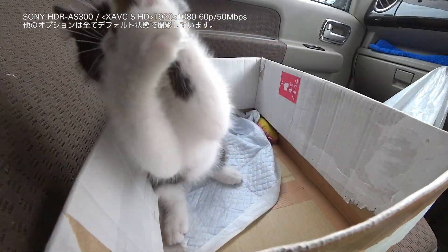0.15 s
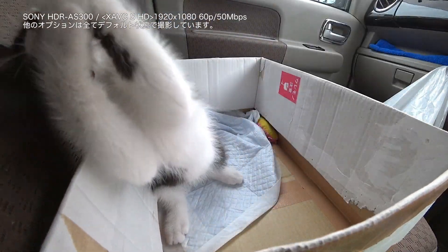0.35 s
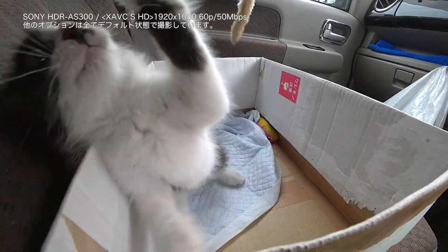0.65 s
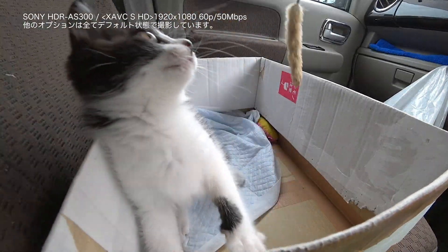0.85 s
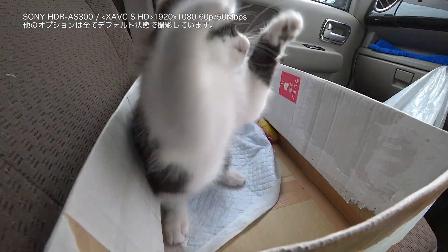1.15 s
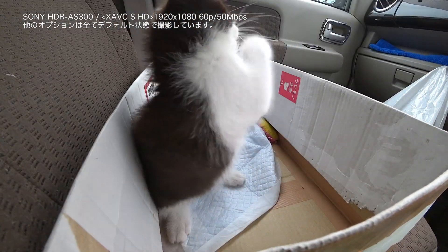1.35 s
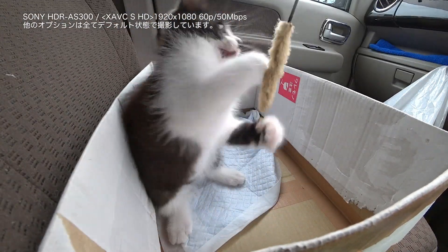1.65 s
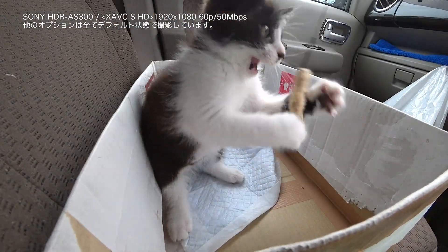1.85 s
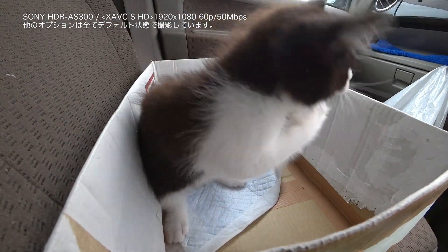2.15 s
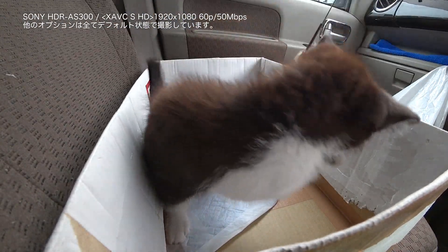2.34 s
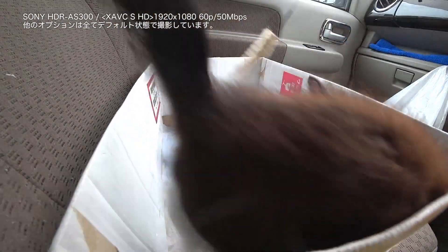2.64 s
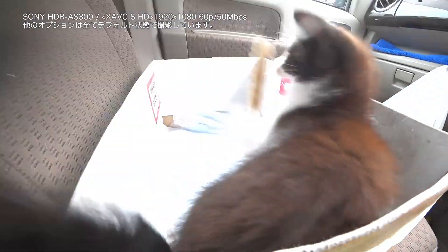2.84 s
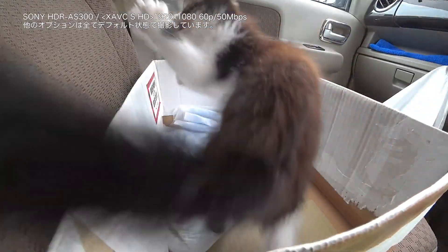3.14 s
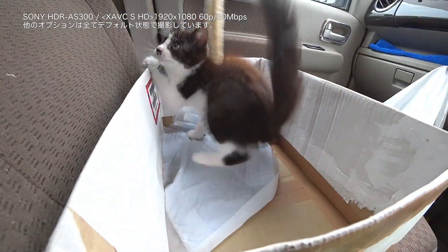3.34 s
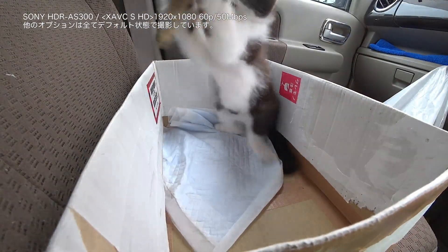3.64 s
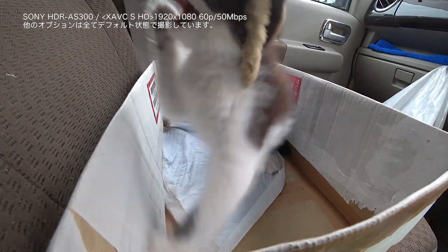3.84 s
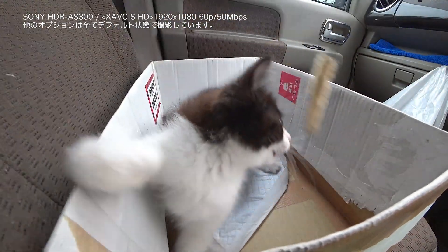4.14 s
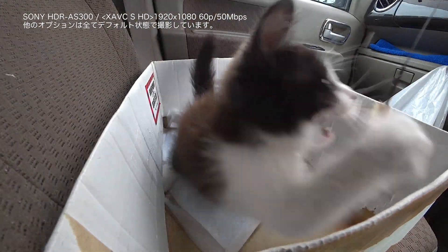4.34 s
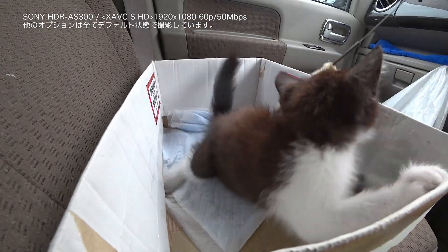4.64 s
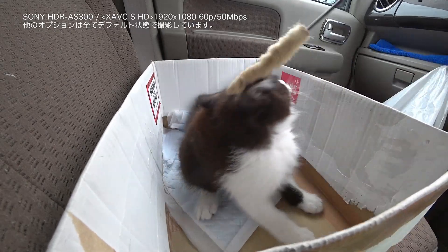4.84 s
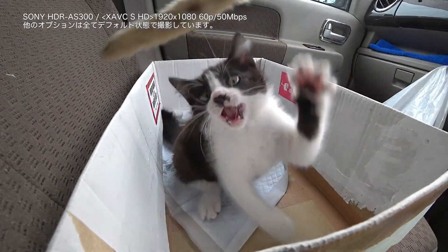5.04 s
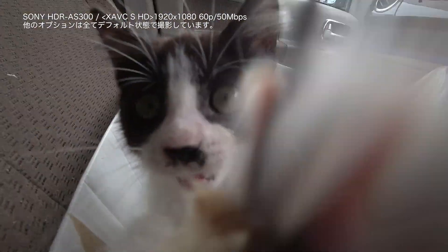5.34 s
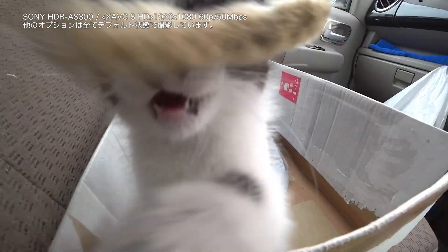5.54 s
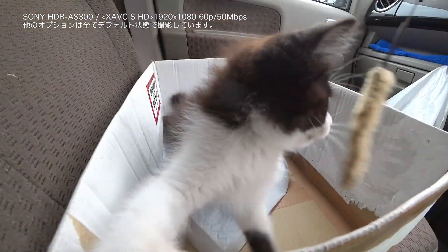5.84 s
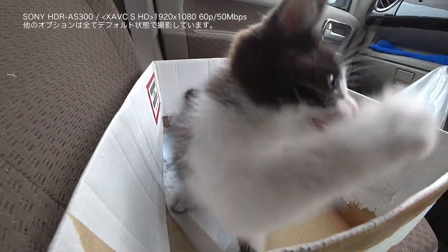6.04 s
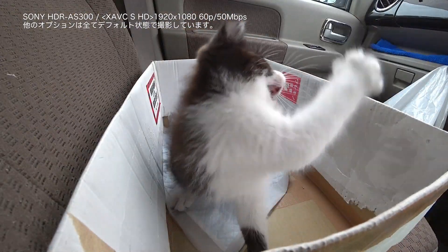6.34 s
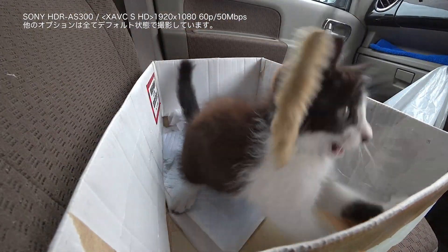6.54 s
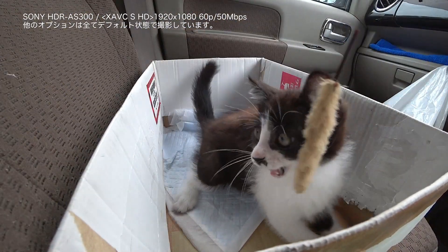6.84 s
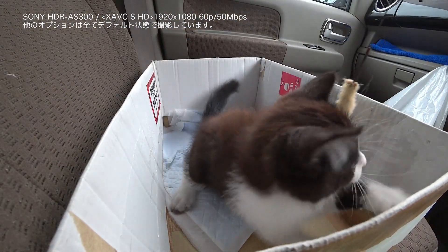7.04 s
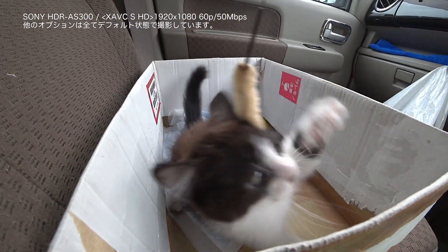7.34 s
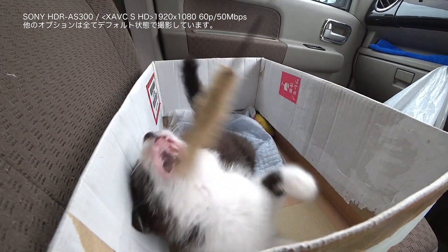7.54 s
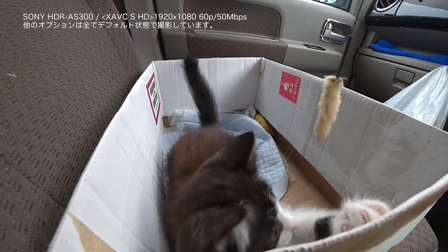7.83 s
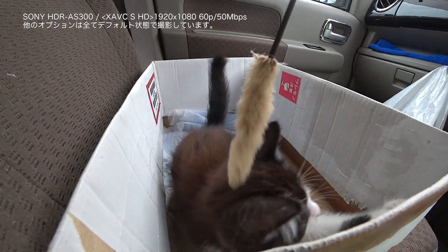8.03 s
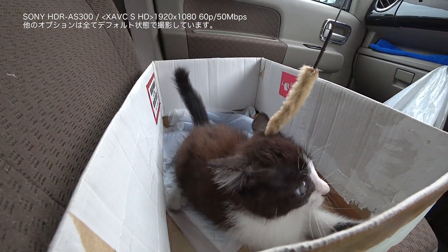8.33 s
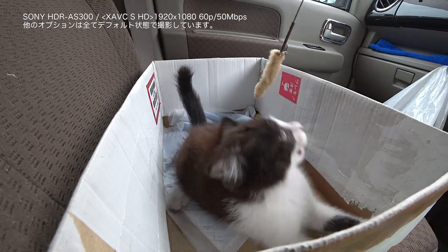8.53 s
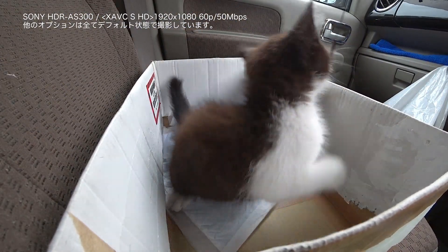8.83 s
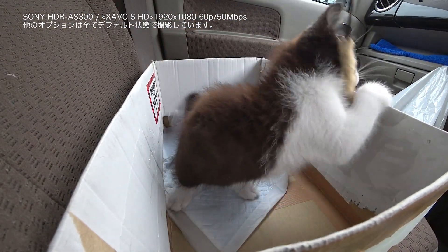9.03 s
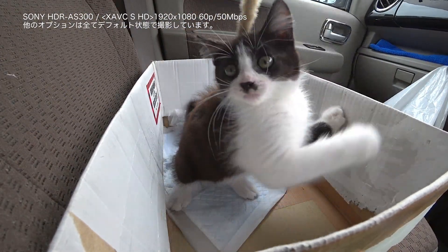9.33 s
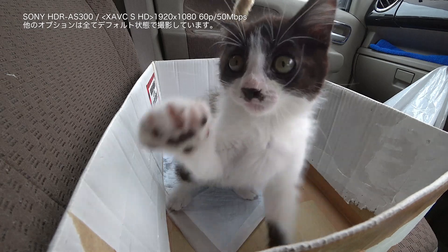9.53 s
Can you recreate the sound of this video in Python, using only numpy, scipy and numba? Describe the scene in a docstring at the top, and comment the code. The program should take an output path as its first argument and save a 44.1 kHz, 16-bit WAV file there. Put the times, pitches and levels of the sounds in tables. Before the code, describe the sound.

A kitten jumps around in a cardboard box, heard close up in a parked car with a faint hush and very little echo. A soft paw knock opens, followed by a sharp claw click and scratch at about 0.9 seconds, then faint fur brushing. From 2.6 seconds, hollow paw thumps, ticks and short scrapes come in quick, irregular clusters, busiest between 3.5 and 5 seconds. Around 5.4 seconds, a bright, crisp swipe of claws sounds especially close and wide. A smaller scuffle follows near 6 seconds and a strong burst of knocks and scratches around 6.5. After a quieter moment, sharp claw strikes land at about 7.8 and 8.1 seconds. Lighter taps and knocks resume near 9 seconds, with a short scrape around 9.5 and a last tap just after.

```python
"""A kitten leaps about in an open cardboard box inside a parked car.
Paws thud on the panels and ring their modes, pads judder over the board, claws tick and
stick-slip along the paper skin, fur brushes the walls. The padded cabin adds a short tail
over a faint hush; a small stereo microphone stands close by."""
import sys
import numpy as np
from scipy import signal
from scipy.fft import rfft, irfft
from scipy.io import wavfile
from scipy.ndimage import uniform_filter1d
from numba import njit

SR = 44100
rng = np.random.default_rng(int(sys.argv[2]) if len(sys.argv) > 2 else 0)


def master_out(mix):
    """Clip the mix to full scale and print it as 16-bit PCM to the path in sys.argv[1]."""
    frames = np.transpose(np.atleast_2d(mix))
    ceiling = np.clip(frames, -1, 1)
    pcm = np.round(ceiling * 32767).astype(np.int16)
    wavfile.write(sys.argv[1], SR, pcm)


N = 426888
LN_60DB = np.log(1000)
SIDE_SIGNS = np.array([[1], [-1]])  # left, right


def undb(db):
    """Decibels to gain."""
    return 10 ** (np.asarray(db) / 20)


def unit_rms(x):
    """Scale to rms 1."""
    return x / np.sqrt(np.mean(x ** 2))


@njit
def svf(x, hz, q):
    """State-variable band-pass, unity gain at its moving centre."""
    y = np.empty(len(x))
    band_state, low_state, damping = 0., 0., 1 / q
    for i in range(len(x)):
        g = np.tan(np.pi * hz[i] / SR)
        v = (band_state + g * (x[i] - low_state)) / (1 + g * (g + damping))
        band_state = 2 * v - band_state
        low_state += 2 * g * v
        y[i] = damping * v
    return y


def band(x, hz, q):
    """Band-pass at a steady or moving centre."""
    return svf(x + 1e-18, np.clip(hz + np.zeros(len(x)), 40, .4 * SR), float(q))


def shaped_noise(spectrum):
    """Steady noise from (f/Hz, level/dB) points, rms 1."""
    hz, db = np.transpose(spectrum)
    bins_hz = np.maximum(np.arange(N // 2 + 1) * SR / N, 1)
    gain = undb(np.interp(np.log(bins_hz), np.log(hz), db))
    return unit_rms(irfft(rfft(rng.standard_normal(N)) * gain, N))


def wander(rate_hz):
    """Random levels joined by ramps, rms 1."""
    hold = max(int(SR / rate_hz), 1)
    steps = np.repeat(rng.standard_normal(N // hold + 1), hold)
    return unit_rms(uniform_filter1d(steps, hold)[:N])


def jolts(rate_hz, fade_s, spread_db):
    """Envelope of random pushes, each dying away."""
    kicks = (rng.random(N) < rate_hz / SR) * undb(spread_db * rng.standard_normal(N))
    return signal.lfilter([1], [1, -np.exp(-1 / (fade_s * SR))], kicks)


def grit(shape, spread_db):
    """Slips of a point over paper fibres: most tiny, a few large."""
    return rng.standard_normal(shape) * undb(spread_db * rng.exponential(size=shape))


def radiate(x, pitch_hz):
    """A small patch of board radiates little below a quarter of its pitch."""
    return signal.sosfilt(signal.butter(2, pitch_hz / 4, "highpass", fs=SR, output="sos"), x)


def pressure(start_s, press_s, hold_s, release_s):
    """Trapezoid of contact force, 0 to 1; returns sample indices and force."""
    knots_s = start_s + np.cumsum([0, press_s, hold_s, release_s])
    span = np.arange(int(start_s * SR), min(int(knots_s[-1] * SR), N))
    return span, np.interp(span / SR, knots_s, [0, 1, 1, 0])


def add_hit(track, start_s, x, peak_db):
    """Mix x into track, scaled to a peak level."""
    i = int(start_s * SR)
    track[i:i + len(x)] += undb(peak_db) * x[:len(track) - i] / np.abs(x).max()


# hush spectra, mid and side: f/Hz, relative density/dB
HUSH_MID_SPECTRUM = [(20, 11.5), (60, 2), (127, -2.5), (370, -10), (937, -2), (1720, -6), (2610, -18),
                     (7600, -16.5), (12000, -10), (16000, -11)]
HUSH_SIDE_SPECTRUM = [(18, -78), (30, -41.5), (404, -2.5), (844, 2.5), (1910, -1.5), (5900, -18),
                      (8520, -18.5), (11100, -18), (16000, -60)]


def hush(mid_db=-61.5, side_db=-60.5):
    """Still air and microphone hiss; the midrange wavers and differs between channels."""
    mid = undb(mid_db + 0.4 * wander(14)) * shaped_noise(HUSH_MID_SPECTRUM)
    side = undb(side_db + 1.4 * wander(6)) * shaped_noise(HUSH_SIDE_SPECTRUM)
    return mid + side * SIDE_SIGNS


# box panel modes: f/Hz, relative level/dB
PANEL_MODES = [(75, -13), (110, -9), (165, -9), (245, -0.5), (330, -4), (435, -3), (600, 2), (720, 3),
               (900, 4), (1150, 5), (1400, 5), (1700, 7), (2050, 3.5), (2500, -1.5)]


def panel_rumble(friction):
    """The middle panel modes, driven by rubbing; rms 1."""
    return unit_rms(sum(undb(db) * band(friction, hz, q=0.98) for hz, db in PANEL_MODES[3:-3]))


# fur hiss spectrum: f/Hz, relative density/dB
FUR_SPECTRUM = [(900, -4), (2400, -7), (4200, -3.5), (6100, -1.5), (9000, -5.5), (12000, -2), (16000, -4)]
# fur strokes on the walls: t/s, press/s, hold/s, release/s, level/dB
FUR_STROKES = [(0.01, 0.053, 0.0091, 0.16, -52), (0.705, 0.08, 0.083, 0.054, -58.5),
               (1.159, 0.25, 0.024, 0.055, -58.5), (1.597, 0.24, 0.011, 0.083, -54),
               (2.01, 0.15, 0.28, 0.074, -63.5), (2.542, 0.014, 0.0092, 0.018, -46),
               (2.899, 0.025, 0.19, 0.13, -51), (3.502, 0.12, 0.023, 0.13, -43),
               (3.744, 0.11, 0.038, 0.028, -47.5), (4.056, 0.017, 0.015, 0.048, -43.5),
               (4.095, 0.041, 0.22, 0.045, -56.5), (4.4, 0.016, .004, 0.014, -58),
               (4.539, 0.045, 0.28, .03, -48.5), (4.918, 0.059, 0.044, 0.3, -51.5),
               (5.207, 0.11, 0.017, .02, -46), (5.486, 0.017, 0.021, 0.22, -56.5),
               (5.63, 0.064, 0.0094, 0.033, -50), (6.705, 0.074, 0.074, 0.024, -55.5),
               (7.408, 0.213, 0.19, .03, -60), (7.8, 0.016, 0.02, 0.15, -60),
               (7.932, 0.054, .02, 0.065, -60), (8.523, 0.026, 0.0065, 0.034, -63.5),
               (8.732, 0.076, 0.015, 0.024, -59.5), (8.954, 0.019, 0.092, 0.053, -48.5),
               (9.163, 0.059, 0.012, 0.076, -55), (9.266, 0.077, 0.046, 0.21, -55.5),
               (9.56, 0.027, 0.0055, 0.033, -62)]


def fur(rest_db=-68.5, force_power=1.9):
    """Hair hisses along the walls, bedding crackles; pads shift weight and the panels murmur."""
    gain = np.full(N, undb(rest_db))
    for *timing, db in FUR_STROKES:
        span, force = pressure(*timing)
        gain[span] += undb(db) * force ** force_power
    brush_db = 20 * np.log10(gain)
    hair = undb(brush_db + wander(21)) * shaped_noise(FUR_SPECTRUM)
    crackle = 1 + 0.94 * jolts(90, fade_s=0.0013, spread_db=2.1)
    murmur = panel_rumble(rng.standard_normal(N))
    weight = 0.65 + jolts(11, fade_s=0.0079, spread_db=3)
    return hair * crackle + undb(0.42 * brush_db - 34) * murmur * weight


# paw landings, lowest under full weight on the floor: t/s, peak/dB, struck f/Hz, T60 at 600 Hz/s
PAW_LANDINGS = [(0.068, -21.5, 490, 0.015), (0.375, -48.5, 810, 0.051), (0.405, -49, 510, 0.019),
                (0.794, -28.5, 800, 0.026), (0.835, -44.5, 440, 0.013), (2.085, -43.5, 960, 0.048),
                (2.582, -22.5, 715, 0.042), (2.599, -30, 434, 0.041), (2.659, -17.5, 720, 0.021),
                (2.687, -24, 880, 0.032), (2.778, -34, 255, 0.016), (2.788, -41, 710, 0.027),
                (2.82, -40, 110, 0.03), (2.83, -24, 515, 0.036), (2.97, -40.5, 240, 0.02),
                (3.323, -23, 260, 0.016), (3.352, -22, 463, 0.024), (3.359, -26, 255, 0.017),
                (3.469, -19, 203, 0.025), (3.499, -30, 400, 0.054), (3.6695, -8.5, 630, 0.021),
                (3.677, -26, 245, 0.05), (3.75, -19.5, 300, 0.03), (3.762, -28.5, 228, 0.052),
                (3.903, -18.5, 1240, 0.051), (3.967, -33, 119, 0.073), (3.972, -13, 417, 0.037),
                (4.027, -11, 1240, 0.018), (4.033, -12, 635, 0.051), (4.243, -41.5, 600, 0.025),
                (4.301, -23.5, 686, 0.024), (4.458, -8, 1360, 0.021), (4.511, -12, 866, 0.048),
                (4.528, -13, 1430, 0.021), (4.549, -25, 960, 0.018), (4.594, -34, 116, 0.032),
                (4.605, -26.5, 313, 0.011), (4.827, -25.5, 423, 0.021), (4.918, -9, 556, 0.026),
                (5.288, -35, 876, 0.023), (5.3365, -13, 697, 0.019), (5.342, -29.5, 118, 0.074),
                (5.398, -17, 1910, 0.014), (5.409, -33.5, 290, 0.016), (5.44, -19, 2130, 0.044),
                (5.911, -29.5, 1420, 0.051), (5.983, -25.5, 1440, 0.023), (5.991, -44, 116, 0.078),
                (5.995, -26, 850, 0.063), (6.442, -9, 1370, 0.032), (6.489, -24, 895, 0.024),
                (6.504, -25, 1650, 0.05), (6.557, -23.5, 1370, 0.06), (6.649, -9, 1490, 0.029),
                (6.92, -43, 713, 0.028), (7.097, -41, 313, 0.039), (7.195, -45.5, 900, 0.037),
                (7.733, -36, 458, 0.015), (7.741, -35, 447, 0.0076), (7.753, -16.5, 950, 0.046),
                (8.112, -22.5, 600, 0.022), (8.193, -31.5, 380, 0.018), (8.919, -26.5, 580, 0.034),
                (9.042, -45, 96.9, 0.061), (9.043, -36, 440, 0.094), (9.097, -17.5, 1065, 0.021),
                (9.636, -33, 1330, 0.16), (9.66, -37, 900, 0.043)]


def paw_thuds(below_db=9, above_db=10.5, skirt_power=1.15, scatter_db=2.5, push_cycles=.7):
    """A soft pad pushes for about a cycle; panel modes near the struck pitch ring most."""
    out, t = np.zeros(N), np.arange(8192) / SR
    mode_hz, mode_db = np.array(PANEL_MODES).T[:, :, None]
    ring_scale = (600 / mode_hz) ** 0.38  # low modes ring longer
    draws = rng.standard_normal((len(PAW_LANDINGS), 3, len(PANEL_MODES), 1))
    for (start_s, peak_db, struck_hz, t60_s), (detune, scatter, phase) in zip(PAW_LANDINGS, draws):
        octaves = np.log2(mode_hz / struck_hz)
        skirt_db = np.where(octaves > 0, above_db, below_db) * np.abs(octaves) ** skirt_power
        gain = undb(mode_db + scatter_db * scatter - skirt_db)
        decay = np.exp(-LN_60DB * t / (t60_s * ring_scale))
        modes = np.sin(2 * np.pi * mode_hz * (1 + 0.065 * detune) * t + 0.57 * phase)
        push = 1 - np.exp(-(t * struck_hz / push_cycles) ** 2)
        thud = (gain * decay * modes).sum(axis=0) * push
        add_hit(out, start_s, radiate(thud, struck_hz), peak_db)
    return out


# claw strikes: t/s, peak/dB, centre f/Hz, T60/s
CLAW_STRIKES = [(0.0724, -35, 2100, 0.026), (0.087, -44, 2020, 0.011), (0.394, -44, 4500, 0.015),
                (0.7905, -21, 4540, 0.021), (0.8706, -10, 3700, 0.0049), (0.882, -4.5, 4800, 0.03),
                (1.12, -28.5, 3680, 0.01), (1.133, -27.5, 3900, 0.012), (1.828, -37, 5960, 0.012),
                (2.138, -41, 4500, 0.02), (2.5837, -17.5, 2210, 0.041), (2.6609, -12, 4350, 0.022),
                (2.831, -15.5, 5900, 0.043), (3.277, -24, 5400, 0.021), (3.322, -28.5, 2140, 0.018),
                (3.3635, -21, 4650, 0.022), (3.4684, -16, 5950, 0.053), (3.6695, -32, 2380, 0.008),
                (3.749, -16.5, 6260, 0.045), (3.822, -37.5, 8000, 0.012), (3.903, -9, 3340, 0.019),
                (3.916, -12, 3480, 0.06), (3.943, -8.5, 3340, 0.03), (4.032, -17.5, 4960, 0.025),
                (4.4512, -11.5, 2700, 0.019), (4.457, -11, 3150, 0.026), (4.4817, -22, 4920, 0.088),
                (4.5101, -13.5, 2200, 0.024), (4.5266, -17.5, 2030, 0.037), (4.9174, -19, 4700, 0.067),
                (5.3432, -7, 2070, 0.011), (5.355, -33, 5000, 0.013), (5.378, -17.5, 1870, 0.0029),
                (5.394, -8.5, 8500, 0.012), (5.398, -10.5, 7500, 0.012), (5.463, -16, 6000, 0.015),
                (5.469, -8, 8500, 0.02), (5.486, -15, 10000, 0.025), (5.495, -10, 7000, 0.025),
                (5.563, -37.5, 1830, 0.027), (5.809, -46, 2500, 0.018), (5.9355, -30, 2100, 0.031),
                (5.9564, -14, 2400, 0.017), (5.982, -29, 2320, 0.022), (6.174, -39.5, 2870, 0.017),
                (6.4421, -5.5, 1960, 0.019), (6.558, -11.5, 2100, 0.0069), (6.6114, -18, 4540, 0.069),
                (6.633, -10, 2800, 0.014), (6.663, -14.5, 5990, 0.02), (7.065, -33.5, 10200, 0.011),
                (7.097, -35.5, 9900, 0.021), (7.1404, -23.5, 3300, 0.016), (7.7545, -7, 3340, 0.0047),
                (7.756, -9.5, 3260, 0.04), (7.795, -15.5, 3400, 0.035), (7.882, -41, 3300, 0.018),
                (8.109, -4.5, 3570, 0.025), (8.236, -38, 2600, 0.017), (8.666, -36, 1870, 0.019),
                (8.785, -42, 4480, 0.02), (8.8072, -31, 2740, 0.036), (8.9196, -23.5, 4150, 0.042),
                (9.097, -18.5, 1870, 0.024), (9.3754, -23, 2550, 0.013), (9.386, -26, 2500, 0.021),
                (9.5833, -32, 2030, 0.028), (9.639, -16.5, 2570, 0.082)]


def claw_ticks(attack_s=0.00011):
    """Several tips land within milliseconds: a gritty, hollow burst."""
    out, t = np.zeros(N), np.arange(4096) / SR
    attack = 1 - np.exp(-t / attack_s)
    all_slips = grit((len(CLAW_STRIKES), len(t)), spread_db=4.43)
    for (start_s, peak_db, hz, t60_s), slips in zip(CLAW_STRIKES, all_slips):
        burst = slips * np.exp(-LN_60DB * t / t60_s) * attack
        burst[8] += 4  # the first tip snaps hardest
        add_hit(out, start_s, radiate(band(burst, hz, q=1.33), hz), peak_db)
    return out


# pad slides: t/s, press/s, hold/s, release/s, level/dB, panel f/Hz
PAD_SLIDES = [(0.604, .04, 0.081, .03, -61.5, 1060), (2.61, .01, 0.031, .02, -62, 700),
              (3.256, 0.0088, 0.0081, 0.009, -51, 810), (3.569, 0.037, 0.037, .01, -52.5, 1470),
              (3.985, 0.016, 0.041, 0.012, -30, 1300), (4.618, 0.015, 0.02, 0.035, -64, 350),
              (4.738, 0.01, 0.013, 0.023, -56, 247), (4.79, 0.0074, 0.026, 0.01, -49, 660),
              (5.015, 0.038, 0.027, 0.017, -58.5, 550), (5.264, 0.011, 0.075, .02, -54.5, 800),
              (6.219, 0.035, .03, 0.055, -54.5, 1090), (6.708, 0.0083, .015, .02, -53.5, 1090),
              (8.96, 0.038, .015, .03, -56, 700), (9.207, 0.016, 0.011, 0.018, -53, 537),
              (9.429, 0.043, 0.034, 0.02, -33, 1830)]


def pad_rubs():
    """A pad judders over the board; the panel under it hums."""
    out = np.zeros(N)
    for *timing, db, hz in PAD_SLIDES:
        span, force = pressure(*timing)
        judder = grit(len(span), spread_db=1.3)
        hum = band(band(judder, hz, q=3.5), hz, q=0.36)
        out[span] += undb(db) * force * unit_rms(hum)
    return out


# claw strokes: t/s, press/s, hold/s, release/s, skin level/dB, full-force f/Hz,
# rumble re skin/dB, sizzle re skin/dB
CLAW_STROKES = [(0.867, 0.019, 0.015, 0.0082, -19.5, 4490, -31, -24),
                (2.579, 0.0022, 0.0029, 0.23, -53, 2680, 5, 5.5),
                (2.673, 0.0022, 0.0035, 0.19, -48, 4970, 6, -23),
                (2.769, 0.053, 0.0026, 0.12, -32.5, 6540, -2.5, -7),
                (3.251, 0.013, 0.0071, 0.013, -45.5, 5730, -14, -25),
                (3.297, 0.053, .004, 0.088, -43, 4680, 4, -5),
                (3.399, 0.032, 0.068, 0.091, -46.5, 5500, 3, -3),
                (3.724, 0.027, 0.0033, 0.042, -39.5, 5550, 5, -2),
                (3.903, 0.0046, 0.048, 0.035, -24, 3300, -10, -6),
                (3.975, 0.011, 0.056, 0.031, -28, 4660, 0, -7),
                (4.272, 0.02, 0.023, .02, -50.5, 5000, 3, -5),
                (4.337, 0.012, 0.014, .015, -44.5, 7000, -12, -2),
                (4.453, 0.0024, 0.1, 0.012, -51, 2490, 6.5, 0),
                (4.75, 0.092, 0.036, 0.0097, -25.5, 4170, -26, -13),
                (5.347, .002, .003, 0.068, -51.5, 2880, 14, -1),
                (5.392, 0.0011, 0.0014, 0.016, -39, 3620, 8, 4),
                (5.411, 0.0055, 0.02, 0.0068, -34, 6000, -9.5, -8),
                (5.435, 0.029, 0.034, 0.0047, -22, 7030, -19.5, -10),
                (5.908, 0.0022, 0.0048, 0.02, -28.5, 5750, -22, -17),
                (5.983, 0.0022, 0.0045, 0.044, -45.5, 3050, 6, -3),
                (6.478, 0.003, 0.024, 0.031, -38, 4780, 2, -4.5),
                (6.556, 0.0018, 0.068, .005, -37.5, 3660, -3.5, -4),
                (6.629, .002, 0.0064, 0.077, -35, 3100, 6.5, -5),
                (7.754, 0.0017, 0.039, 0.026, -36.5, 3580, -5, -9),
                (8.105, 0.0014, 0.061, 0.088, -33.5, 3060, -2, -9),
                (8.254, 0.0056, 0.016, 0.016, -64.5, 3170, 14, -10),
                (8.597, 0.049, 0.0035, 0.011, -39, 2750, -9.5, -8.5),
                (8.918, 0.016, 0.0099, 0.029, -36, 5300, -8.5, -13),
                (9.335, 0.051, .004, 0.019, -51.5, 3050, 9.5, -28),
                (9.421, 0.072, 0.016, .018, -22.5, 4470, -20, -9),
                (9.636, 0.0027, 0.0036, 0.029, -43, 2750, -4, 4)]


def claw_drags(climb_oct=.6, wobble_oct=.12, rasp_db=3, skin_hz=4500):
    """Claws stick and slip on the paper skin: a resonance slides, panels rumble, fibres sizzle."""
    gains, hz = np.zeros((3, N)), np.full(N, 4000.)
    force_powers = np.array([[1.82], [1.65], [1.92]])  # skin, rumble, sizzle
    for *timing, db, centre_hz, rumble_db, sizzle_db in CLAW_STROKES:
        span, force = pressure(*timing)
        gains[:, span] += undb([[db], [db + rumble_db], [db + sizzle_db]]) * force ** force_powers
        hz[span] = centre_hz * 2 ** (climb_oct * (force - 1))  # pressed harder, a claw runs faster
    hz = uniform_filter1d(hz, size=200) * 2 ** (wobble_oct * wander(60))  # the skin gives
    # the claw catches on the flutes under the paper and tears free
    slips = grit(N, spread_db=2.6) * undb(1.52 * wander(300) + 1.05 * wander(70))
    slips *= 0.5 + .4 * jolts(120, fade_s=0.0025, spread_db=1.5)
    rasp = undb(rasp_db) * band(slips, hz, q=4.5)  # the hollow under the paper
    skin = band(band(slips, hz, q=0.41) + rasp, hz, q=0.21)
    skin /= np.sqrt(hz)  # offsets the wider band at higher pitch
    sizzle = band(band(slips, 11360, q=1), 11800, q=1)
    layers = [unit_rms(radiate(skin, skin_hz)), panel_rumble(slips), unit_rms(sizzle)]
    return (uniform_filter1d(gains, size=100) * layers).sum(axis=0)


def cabin(x, mid_t60_s=0.067, side_t60_s=.035, mid_db=-13.5, side_db=-9, air_db=-10):
    """Seats and glass return a short dense tail; differences between microphone ports add width."""
    t = np.arange(int(.25 * SR)) / SR
    tails = rng.standard_normal((2, len(t))) * np.exp(-LN_60DB * t / [[mid_t60_s], [side_t60_s]])
    tails *= 1 - np.exp(-t / .001)
    mid, diffuse = (signal.fftconvolve(x, tail / np.linalg.norm(tail))[:N] for tail in tails)
    side = undb(side_db) * band(band(diffuse, 2000, q=0.47), 2000, q=0.47)
    side += undb(air_db) * band(diffuse, 12000, q=0.57)
    lead_samples = 1.49  # the lows reach the left port early, the right late
    side += lead_samples * np.gradient(band(x, 350, q=0.79))
    side[int(5.385 * SR):int(5.52 * SR)] *= undb(9.2)  # a swipe right at the ports sounds wider
    return undb(mid_db) * mid + side * SIDE_SIGNS


# kitten position: t/s, left minus right/dB
KITTEN_PAN = [(0, 0), (2.7, -1.5), (3.6, -0.5), (4.5, -1.8), (5.6, -0.5), (6.3, -1.5), (7.8, -2.5),
              (9.68, -2)]


def scene():
    """The panned kitten, the cabin tail and the hush."""
    pan_db = np.interp(np.arange(N) / SR, *np.transpose(KITTEN_PAN))
    kitten = paw_thuds() + claw_ticks() + claw_drags() + pad_rubs() + fur()
    return kitten * undb(SIDE_SIGNS * pan_db / 2) + cabin(kitten) + hush()


def record(dry, port_low_hz=101, port_high_hz=11700, top_hz=15750, cutoff_hz=16700):
    """Small ports lose deep bass and high treble; two steep low-passes close the top."""
    ports = signal.butter(2, [port_low_hz, port_high_hz], "bandpass", fs=SR, output="sos")
    top = signal.ellip(6, .2, 32, top_hz, fs=SR, output="sos")
    cutoff = signal.ellip(12, .2, 90, cutoff_hz, fs=SR, output="sos")
    return signal.sosfilt(np.vstack([ports, top, cutoff]), dry)


dry = scene()
out = record(dry)
master_out(out)
```